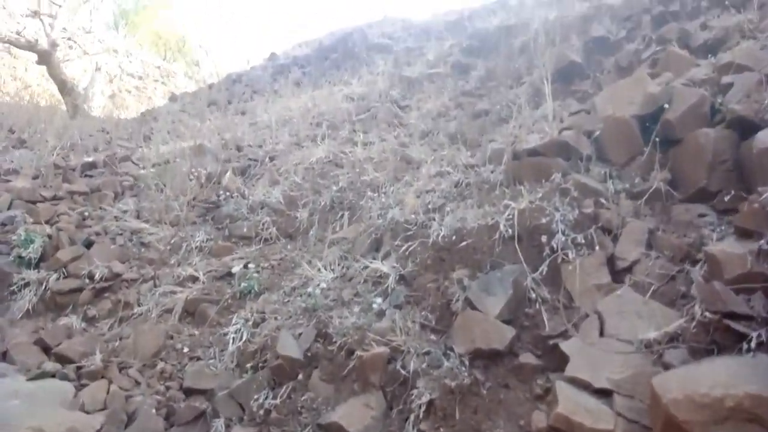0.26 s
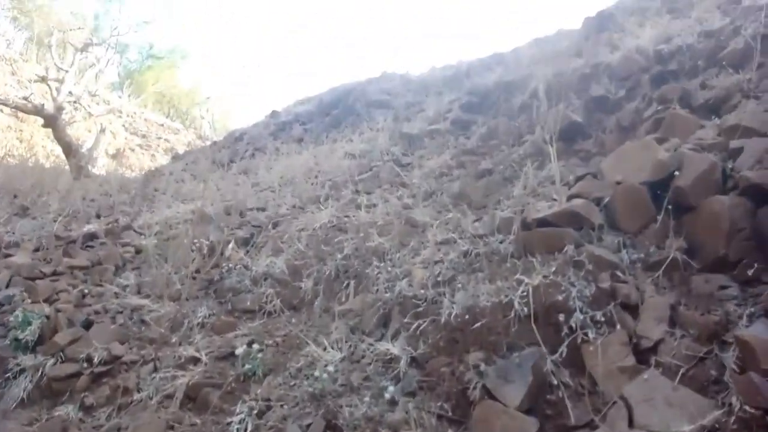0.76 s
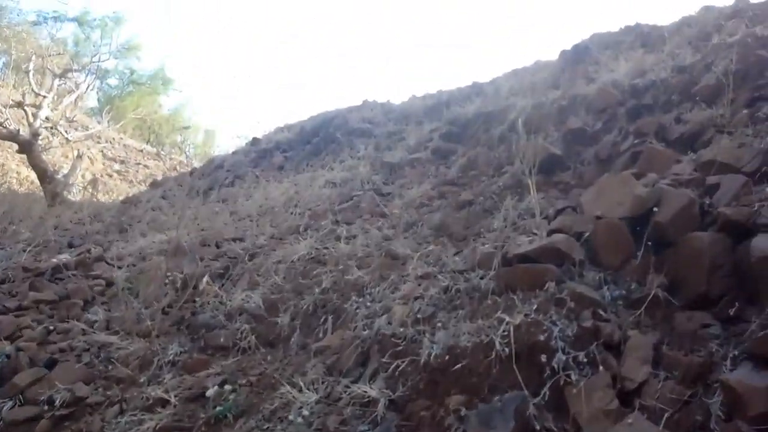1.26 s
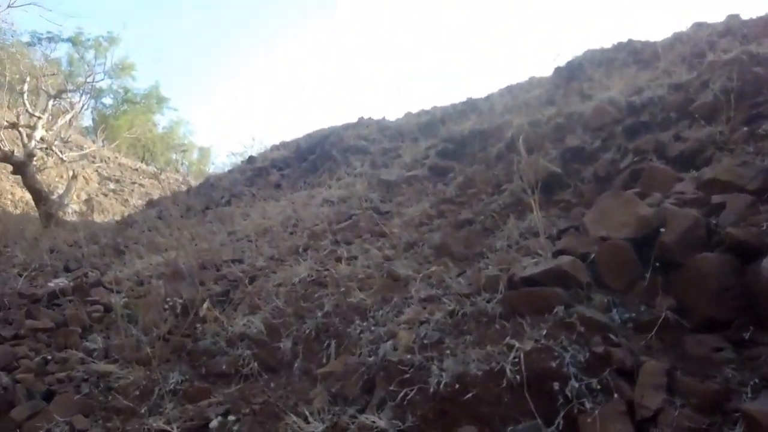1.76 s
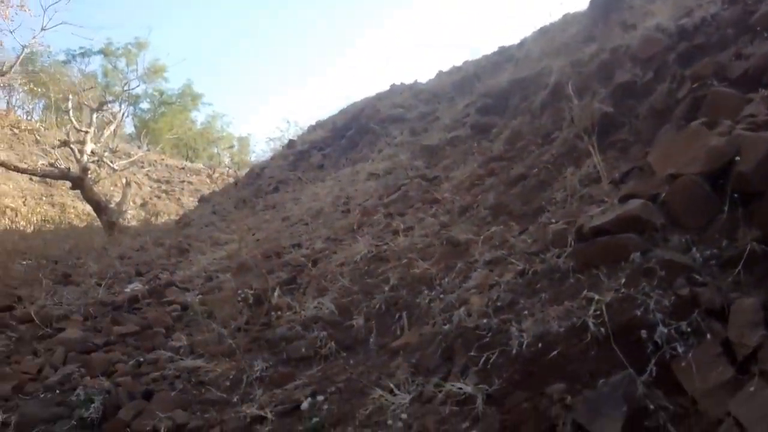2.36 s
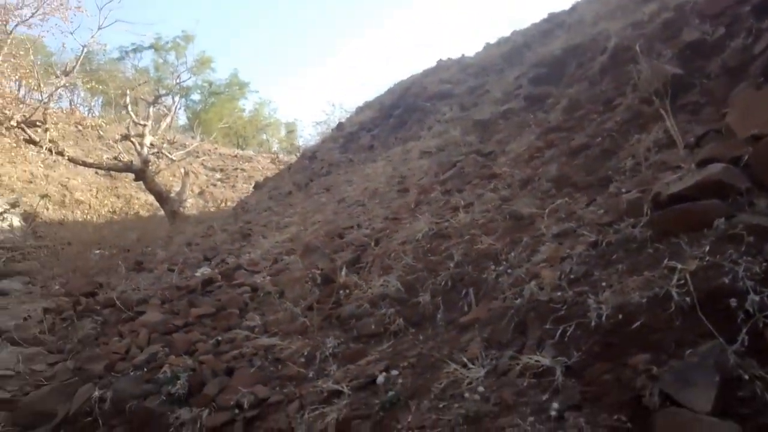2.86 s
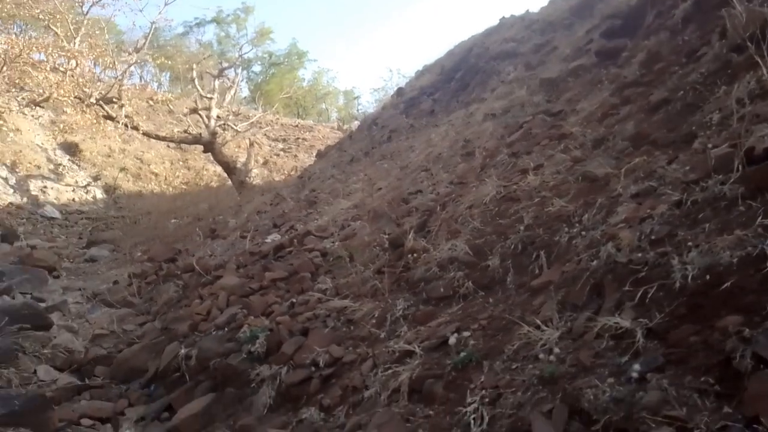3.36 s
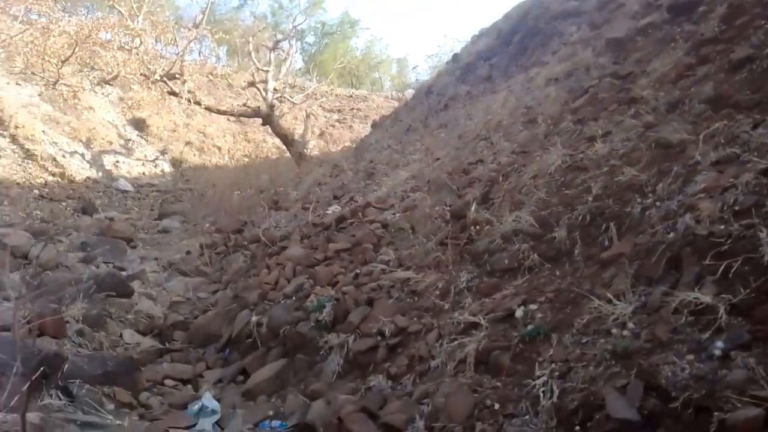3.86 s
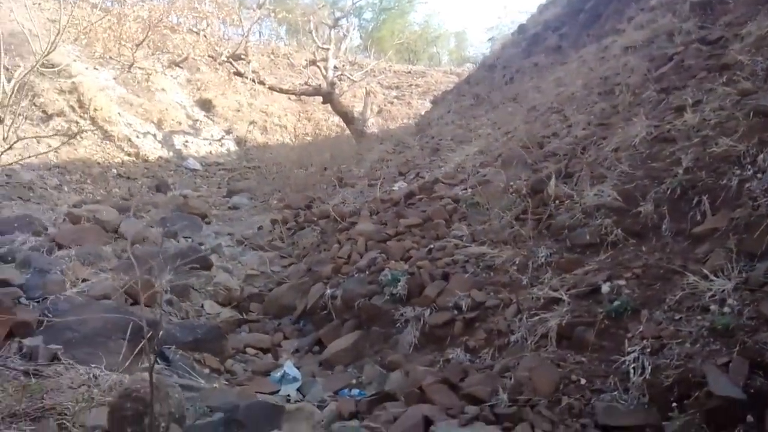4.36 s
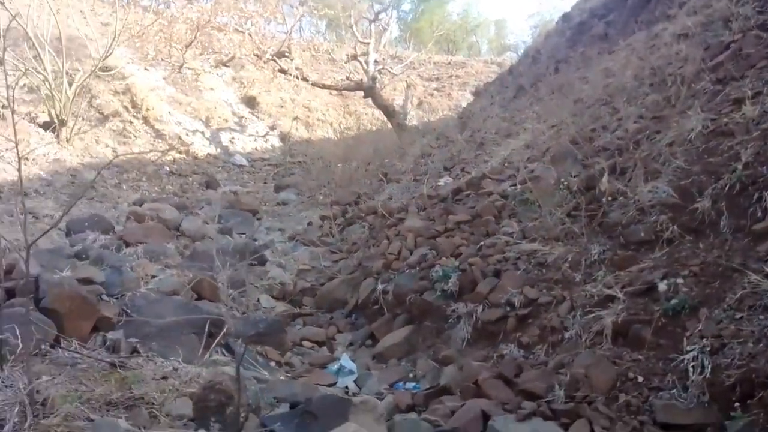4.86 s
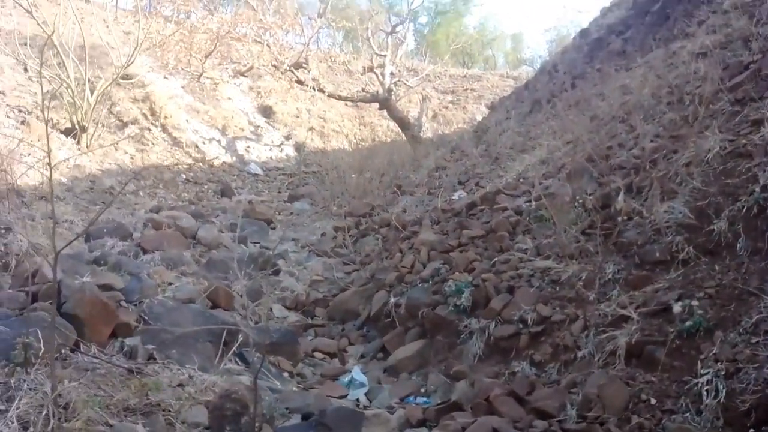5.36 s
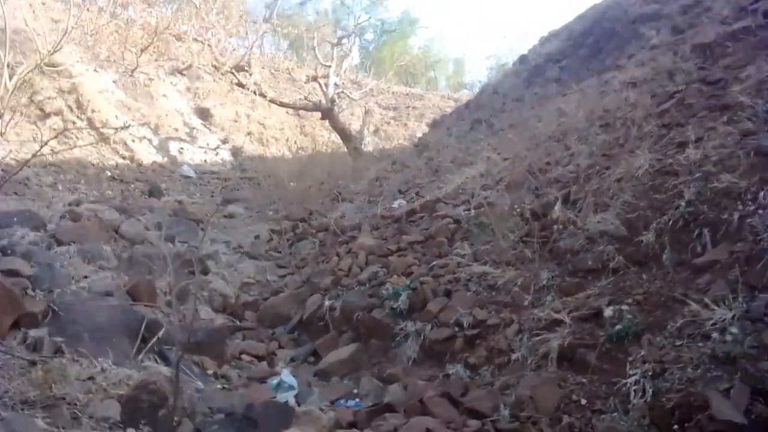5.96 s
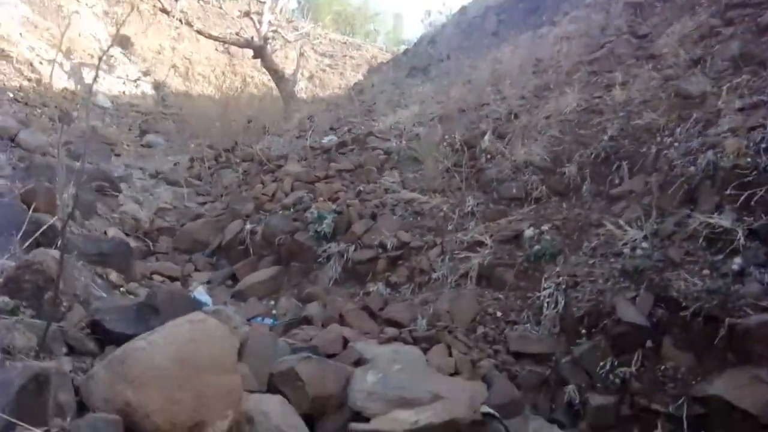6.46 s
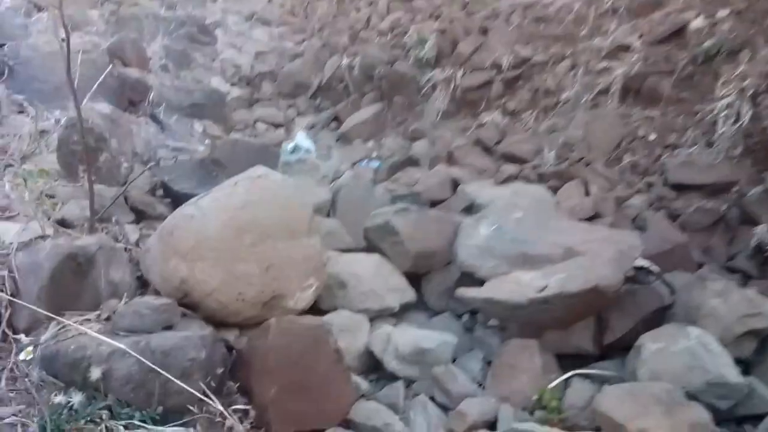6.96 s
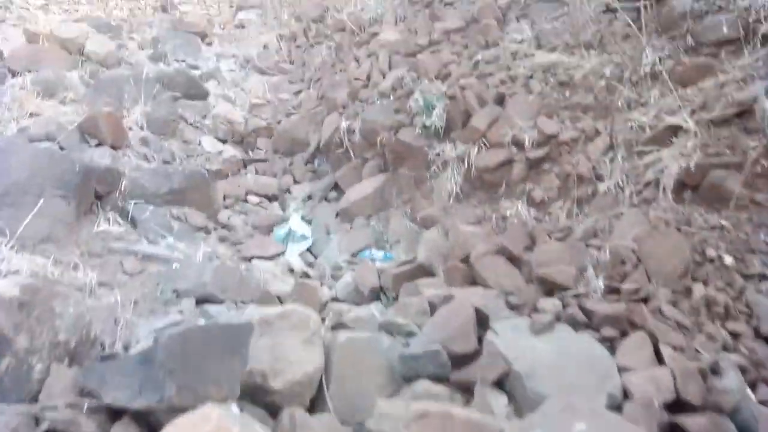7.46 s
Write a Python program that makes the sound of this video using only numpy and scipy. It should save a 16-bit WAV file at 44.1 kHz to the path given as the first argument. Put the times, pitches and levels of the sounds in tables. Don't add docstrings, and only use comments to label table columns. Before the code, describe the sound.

Someone walks slowly over loose stones and dry grass in a dry stream bed, heard close on a hand-held phone. Sharp isolated snaps open the scene, grit crunches and grass rustles, pebbles click. Faint birds pipe far away. Near the end a rock works loose, scrapes, squeaks briefly and lands with a hard thud; the sound then dulls, and larger cobbles knock and settle low.

```python
import sys
import numpy as np
from scipy import signal
from scipy.fft import rfft, irfft
from scipy.io import wavfile
from scipy.ndimage import uniform_filter1d

SR = 44100
rng = np.random.default_rng(int(sys.argv[2]) if len(sys.argv) > 2 else 0)


def dump_mix(stems):
    frames = np.atleast_2d(stems).T
    limited = np.clip(frames, -1, 1)
    pcm = np.round(limited * 32767).astype(np.int16)
    wavfile.write(sys.argv[1], SR, pcm)


def voltage_ratio(level):
    return 10 ** (np.asarray(level, float) / 20)


N = 340319


def evened(x):
    return x / np.sqrt(np.mean(x ** 2) + 1e-20)


def read(points, hz):
    f, value = np.transpose(points)
    return np.interp(np.log(hz + 1), np.log(f + 1), value)


def add(mix, s, sound):
    sound = sound[max(-round(s * SR), 0):]
    part = mix[max(round(s * SR), 0):][:len(sound)]
    part += sound[:len(part)]


def band(x, hz, width):
    f = np.fft.rfftfreq(len(x), 1 / SR)
    bell = np.exp(-.5 * ((f - hz) / width) ** 2)
    return evened(irfft(rfft(x) * bell, len(x)))


def flick(t, hz, cycles):
    return -np.cos(2 * np.pi * hz * t) * np.exp(-.5 * (t * hz / cycles) ** 2)


def tipped(s):
    return np.clip((s - 5.9) / 0.28, 0, 1)


def wavering_tone(rows, wander_hz):
    s, hz, db = np.transpose(rows)
    t = np.arange(s[0], s[-1], 1 / SR)
    chance = rng.standard_normal((2, SR + SR // 8))
    wander = evened(uniform_filter1d(chance, 130, axis=1))[:, :len(t)]
    pitch = uniform_filter1d(np.interp(t, s, hz), size=200) + wander_hz * wander[0]
    level = voltage_ratio(np.interp(t, s, db) + 2.1 * wander[1])
    return s[0], level * np.sin(2 * np.pi * np.cumsum(pitch) / SR) * signal.windows.tukey(len(t), .22)


def rumble():
    t = np.arange(N) / SR
    lumps = voltage_ratio(2.6 * band(rng.standard_normal(N), 0, 2.8))
    noise = rng.standard_normal(N)
    settling = voltage_ratio(-67.5) * band(noise, 366, 45) * np.exp(-.5 * ((t - 7.42) / 0.21) ** 2)
    swish = voltage_ratio(-86.5) * band(noise, 10000, 1100) * np.exp(-.5 * ((t - 3.83) / .17) ** 2)
    breeze = lumps * (voltage_ratio(-64.5) * band(noise, 40, 30) + voltage_ratio(-68.5) * band(noise, 110, 88))
    sway = voltage_ratio(-78.0) * band(noise, 5, 6.0)
    return settling + swish + breeze + sway


# (time [s], pitch [Hz], level [dB])
BIRD_CALLS = [
    [(-.15, 2760, -74), (.26, 2720, -73), (.45, 2740, -84), (.56, 2710, -67), (.66, 2710, -75),
     (.95, 2690, -84)],
    [(1.165, 6450, -78), (1.2, 6730, -79), (1.245, 5400, -62)],
    [(3.42, 6230, -72), (3.46, 6700, -81), (3.52, 5200, -60)],
    [(5.585, 2780, -69), (5.61, 2700, -62), (5.655, 2700, -61)],
    [(6.29, 2780, -67), (6.33, 2900, -57.5), (6.355, 2960, -67), (6.38, 2975, -56.5), (6.42, 2950, -80)],
    [(6.6, 3200, -72), (6.65, 3200, -67), (6.69, 3210, -81), (6.74, 3200, -74), (6.79, 3170, -69)],
    [(6.855, 3600, -66), (6.89, 3550, -60), (6.93, 3300, -72)],
    [(7.288, 2280, -61), (7.297, 3030, -61), (7.316, 2070, -59), (7.326, 2270, -68), (7.337, 2620, -65),
     (7.35, 2150, -61)],
]


def bird(rows):
    return wavering_tone(rows, 22)


# (start [s], end [s], level [dB], ring against level [dB])
GRASS_SWEEPS = [(-.2, 0.517, -77, -11), (0.664, 1.037, -68, -13), (0.97, 1.274, -71.5, -8.5),
                (1.22, 1.48, -80, 1), (1.57, 1.703, -81, 4.5), (1.814, 2.128, -74, -15),
                (2.153, 2.63, -67, -12), (2.546, 2.816, -68.5, -11.5), (2.862, 3.273, -65.5, -10.5),
                (3.215, 3.725, -65.5, -10), (3.573, 4.21, -61, -11), (4.09, 4.625, -63.5, -12),
                (4.403, 5.185, -64.5, -14), (5.14, 5.41, -66, -11), (5.336, 5.506, -56, -14),
                (5.527, 5.857, -60, -13.5), (5.783, 5.963, -52.5, -11), (5.897, 6.1, -68, -3.5),
                (5.44, 5.6, -68.5, -14), (2.78, 2.92, -83.5, 4), (6.307, 6.743, -70, -6),
                (6.605, 7.27, -64.5, -4), (6.929, 7.033, -57, -6.5), (7.055, 7.183, -63.5, -7),
                (6.997, 8.19, -73.5, -2)]


def sweeps(t):
    edge = 0.58
    still_db, tipped_still_db = [-70, -76, -88], [-66, -70, -81]
    tip = tipped(t)
    power = voltage_ratio(np.outer(still_db, 1 - tip) + np.outer(tipped_still_db, tip)) ** 2
    low_db = -4.5 + 6.5 * tip
    for start, end, db, ring_db in GRASS_SWEEPS:
        u = (t - start) / (end - start)
        shape = np.sin(np.pi / 2 * np.clip(np.minimum(u, 1 - u) * 2 / edge, 0, 1)) ** 2
        power = power + shape * voltage_ratio(db + np.array([low_db, 0 * t, ring_db + 0 * t])) ** 2
    return np.sqrt(power)


# (frequency [Hz], density [dB per Hz])
LEVEL_COLOUR = [(88, -23.5), (150, 2.5), (434, -13), (934, -6), (1600, -6), (2150, -0.5), (2650, -6.5),
                (3100, -13.5), (3750, -12), (4330, -17), (5350, -10), (6400, -23.5), (7370, -34),
                (10900, -35.5), (16500, -53.5)]
# (frequency [Hz], density [dB per Hz])
TIPPED_COLOUR = [(88, -36), (150, 6), (250, -2.5), (386, -3), (682, -7.5), (1050, -10.5), (1350, -13.5),
                 (2500, -17.5), (6300, -25.5), (7900, -24), (9300, -35.5), (13500, -40.5), (15200, -32),
                 (16500, -28)]


def rustle():
    frames, hz = N // 64 + 8, np.fft.rfftfreq(256, 1 / SR)
    size = frames * 64
    t = np.arange(frames) * 64 / SR
    tip = tipped(np.arange(size) / SR)

    ticks = voltage_ratio(2.16 * np.minimum(rng.exponential(1, size), 5))
    ticks = ticks * (rng.random(size) < 400 / SR)
    drive = evened(rng.standard_normal(size) + 3.7 * ticks * (1 - 0.46 * tip))

    stray = voltage_ratio(1.5 * (-1 + np.minimum(rng.exponential(1, size), 3)))
    stray = stray * (rng.random(size) < 42 / SR) * (1 - 0.83 * tip)
    lift = signal.lfilter([1], [1, -np.exp(-1 / (.003 * SR))], stray)
    drive = drive * (1 + 1.1 * lift) + 2.7 * stray

    z = signal.stft(drive, nperseg=256, noverlap=192)[2][:, :frames]
    luck = rng.standard_normal((frames, 129))
    patches = evened(uniform_filter1d(uniform_filter1d(luck, 30, 0), 3, 1)).T
    specks = evened(uniform_filter1d(uniform_filter1d(luck[::-1], 6, 0), 7, 1)).T
    flicker = evened(uniform_filter1d(rng.standard_normal(frames), size=8))
    texture_db = 1.8 * patches + 1.0 * flicker + 2.13 * np.maximum(specks, -.5) - 1.46

    level_db = np.outer(read(LEVEL_COLOUR, hz), 1 - tipped(t))
    tipped_db = np.outer(read(TIPPED_COLOUR, hz), tipped(t))
    colour = voltage_ratio(level_db + tipped_db)
    part = np.searchsorted([900, 3800], hz)  # low, body and ring meet at these Hz
    for k, level in enumerate(sweeps(t)):
        share = np.sqrt((colour[part == k] ** 2).sum(0) / len(hz))
        colour[part == k] *= level / share
    z = z * uniform_filter1d(colour, size=2, axis=0) * voltage_ratio(texture_db)
    return signal.istft(z, nperseg=256, noverlap=192)[1][:N]


# (time [s], peak [dB])
STALK_TICKS = [(1.051, -62), (3.589, -63), (4.093, -57), (4.8355, -60), (4.9125, -64), (4.9805, -63),
               (5.174, -61), (5.2715, -62), (5.314, -55), (5.768, -57), (5.7765, -53), (5.911, -31),
               (6.9165, -54)]


def stalk(s, db):
    t = np.arange(200) / SR - .002
    return s - .001, voltage_ratio(db + 1) * (flick(t, 5030, 1.46) + 0.48 * flick(t, 10100, 0.92))


# (time [s], level [dB], pitch [Hz])
DRY_CHIPS = [(0.801, -65, 5700), (0.906, -60, 2010), (.983, -74, 5640), (.999, -70, 5500),
             (1.047, -67, 5500), (1.097, -70, 5600), (1.096, -57, 2120), (1.117, -70, 5530),
             (1.186, -60, 2300), (2.399, -66, 6200), (2.442, -59, 5100), (2.623, -69, 5600),
             (2.684, -64, 5900), (2.9, -60.5, 3320), (2.9338, -66, 3550), (2.973, -73, 5700),
             (3.0116, -58, 3610), (3.0186, -58, 4930), (3.02, -49, 2340), (3.145, -61, 5650),
             (3.2052, -64, 5430), (3.4203, -53, 2090), (3.4217, -57.5, 3800), (3.733, -55, 4650),
             (4.0285, -53, 4680), (4.2109, -62.5, 5360), (4.26, -54, 5070), (4.3327, -64, 5300),
             (4.4993, -61, 4050), (4.5008, -47, 2070), (4.5881, -64.5, 5500), (4.863, -64, 5200),
             (4.893, -67, 3600), (4.9383, -61, 4650), (4.9927, -60, 5380), (5.098, -65, 5100),
             (5.2107, -55, 2130), (5.2521, -61, 4500), (5.2843, -41, 5620), (5.37, -58, 5200),
             (5.8412, -47, 5400), (5.9278, -48, 4240), (5.9645, -58, 3000), (5.9645, -57, 4720),
             (5.9776, -51.5, 4570), (6.0024, -60, 2530), (6.0024, -59, 4400), (6.02, -65, 4500),
             (6.0955, -67, 2130), (6.151, -59, 860), (6.2982, -68, 4300), (6.493, -52, 7700),
             (6.5062, -59, 4290), (6.5366, -59, 5400), (6.5935, -68, 4340), (6.6349, -65, 5240),
             (6.6514, -59.5, 4420), (6.686, -55.5, 7600), (6.9896, -53, 4770), (7.1108, -57, 3360)]


def chip(s, db, hz):
    top_s = 0.0011
    noise = rng.standard_normal(1024)
    u = np.arange(len(noise)) / SR / top_s
    tone = band(noise, hz, 0.059 * hz) + 0.44 * band(noise, hz, 1100)
    air = 0.083 * band(noise, 10500, 2400)
    return s - .5 * top_s, voltage_ratio(db) * (tone + air) * u * np.exp(1 - u)


def grit(s, chance, hz, ring_db, air_db, knock_db):
    grains = chance[0] * voltage_ratio(3.0 * evened(uniform_filter1d(chance[1], size=40)))
    stones = 0.55 * band(grains, hz, 120) + 0.079 * band(grains, hz * 1.52, 200)
    body = 0.8 * band(grains, 2150, 1230)
    tip = tipped(s)
    ring = band(grains, 5500 - 500 * tip, 650 + 1000 * tip)
    air = band(grains, 10500 - 2300 * tip, 2600 - 1500 * tip) + 0.39 * tip * band(grains, 15700, 2700)
    knock = band(grains, 310, 320)
    return stones + body + voltage_ratio(ring_db) * ring + voltage_ratio(air_db) * air + voltage_ratio(knock_db) * knock


# (time [s], level [dB], pitch [Hz], ring [dB])
GRIT_PINCHES = [(.194, -57, 1370, -3), (.783, -50, 2310, -15), (.808, -58, 2270, -11),
                (.842, -53, 2520, -9), (.853, -57, 2360, -5), (1.009, -57, 2020, -13),
                (1.023, -54.5, 3030, -7.5), (1.14, -54, 2250, -14), (1.201, -52, 2160, -17),
                (2.286, -69, 1710, 3.5), (2.418, -52.5, 1960, -14), (2.484, -53, 2200, -19),
                (2.769, -54, 2520, -14), (3.07, -51, 2070, -16), (3.128, -58.5, 2490, -3),
                (3.462, -51.5, 2860, 4), (3.54, -56, 2260, -13), (3.643, -50, 2090, -12),
                (3.732, -46.5, 1660, -0.5), (3.898, -52.5, 2120, -9), (4.426, -44.5, 2180, -10.5),
                (4.708, -54, 2370, -18), (4.963, -62, 2220, -2), (5.133, -58, 2240, -10),
                (5.322, -56.5, 2000, 1), (5.759, -59, 1740, 1), (6.041, -56, 2880, -10),
                (6.166, -53, 2000, -7.5), (6.864, -54, 2560, -4.5), (7.104, -48, 1380, -17)]
# (time [s], level [dB], pitch [Hz], ring [dB])
GRIT_CRUNCHES = [(.242, -66, 2190, -4.5), (.426, -56.5, 1540, -12), (.722, -53, 2460, -12),
                 (.819, -46, 1950, -14.5), (.941, -56, 2800, -6.5), (1.06, -52.5, 2420, -13),
                 (1.977, -66, 1480, 0.5), (2.44, -54, 2050, -5.5), (2.465, -57.5, 2370, -2.5),
                 (2.539, -45.5, 2420, -14.5), (2.593, -52, 1730, -12), (2.647, -58, 2070, -11),
                 (3.004, -46.5, 2340, -10), (3.029, -55, 1450, -8), (3.175, -47, 2360, -17.5),
                 (3.195, -56, 2150, -9), (3.219, -56, 2470, -6), (3.375, -55.5, 2230, -10),
                 (3.493, -58, 2380, -15), (4.081, -51.5, 1970, -13), (4.264, -53, 1950, -10),
                 (4.726, -49, 2570, -9.5), (4.763, -52.5, 1720, -8), (5.016, -41.5, 2100, -9),
                 (5.2, -58, 2060, -4.5), (5.285, -42, 2400, -12), (6.493, -57.5, 2770, -0.5),
                 (6.537, -55, 1000, -9.5), (6.939, -58, 1820, 8.5), (7.091, -51, 1930, -6)]


def crunch(s, db, hz, ring_db, top_s):
    u = np.arange(1600) / SR / top_s
    air_db = ring_db - 13.0 + 12 * tipped(s)
    first = .7 + 3 * np.exp(-u / .4)
    grains = grit(s, rng.standard_normal((2, 1600)), hz, ring_db, air_db, -50)
    return s, voltage_ratio(db) * grains * u * np.exp(1 - u) * first


# (time [s], peak [dB], mode [Hz], t60 [s])
STONE_RINGS = [(1.987, -48.5, 394, 0.053), (1.987, -43.5, 918, 0.032), (3.688, -41, 384, .035),
               (3.688, -43, 596, .025), (3.722, -45, 393, 0.063), (3.722, -43, 645, 0.031),
               (3.79, -46, 240, .03), (3.8054, -37.5, 396, .035), (3.8055, -37, 613, 0.015),
               (3.9579, -25, 1400, 0.018), (3.9643, -30.5, 290, 0.02), (4.491, -48, 393, 0.074),
               (4.491, -42, 600, 0.024), (5.435, -29.5, 1830, 0.0066), (5.465, -37.5, 220, 0.047),
               (5.506, -42, 296, .025), (5.521, -45, 170, 0.055), (5.572, -47, 190, 0.056),
               (5.588, -44, 190, 0.079), (5.871, -27, 966, 0.054), (5.871, -28, 2260, .015),
               (6.705, -35.5, 350, 0.027), (6.705, -30.5, 910, 0.037), (6.706, -42, 1440, .03),
               (6.707, -38, 2600, 0.017), (6.713, -42, 897, 0.032), (6.77, -47, 950, 0.038),
               (6.8, -34, 373, 0.026), (6.7998, -41, 1000, .02), (6.808, -36, 632, 0.078),
               (6.811, -37, 850, 0.059), (6.83, -42, 1240, 0.027), (7.002, -43, 430, 0.046),
               (7.003, -44, 250, 0.05), (7.103, -41, 1430, 0.033), (7.122, -41.5, 433, .045),
               (7.141, -43, 264, 0.037), (7.141, -46, 684, .025), (7.168, -49, 420, .05),
               (7.204, -41, 258, 0.043), (1.987, -50, 600, 0.032), (2.561, -22, 3120, 0.0042),
               (3.8032, -33.5, 2810, 0.014), (6.51, -47, 184, 0.089), (6.702, -45, 169, 0.055)]


def ringing(s, db, hz, t60):
    t = np.arange(4000) / SR
    return s, -voltage_ratio(db - 60 * t / t60) * np.sin(2 * np.pi * hz * t) * (1 - np.exp(-t / 0.00022))


# (time [s], peak [dB], pitch [Hz], ring [dB], knock [dB])
STEM_SNAPS = [(.3358, -9.5, 1920, -23.5, -16), (1.3249, -8, 1880, -24, -12.5),
              (1.4984, -13, 2560, -4.5, -46), (1.5389, -10, 1880, -28.5, -11.5),
              (1.9871, -43, 1490, -22, -9), (2.5614, -17.5, 1084, -26, -34),
              (3.6869, -26.5, 1450, -11.5, -13), (3.7105, -28.5, 1410, -15, -10),
              (3.716, -31, 1520, -3.5, -9), (3.8042, -22, 1790, -9.5, -14), (3.83, -28.5, 1650, -14, -14),
              (3.9478, -25, 1790, -32, -9), (3.9599, -25.5, 2000, 1.5, -26),
              (3.9635, -25.5, 1950, -10, -3.5), (4.0342, -21, 1800, -27, -14.5),
              (4.4899, -22, 1900, -5.5, -11.5), (4.538, -33.5, 1900, -18, -9),
              (4.611, -39.5, 1410, -25, -13), (4.662, -38.5, 1280, -28, -18)]
# (time [s], peak [dB], pitch [Hz], ring [dB], knock [dB])
ROCKFALL_CLICKS = [(5.436, -28.5, 790, -36, 3.5), (5.5054, -51, 660, -17, 13),
                   (5.5587, -32.5, 1200, -21, -28), (5.6211, -13.5, 1770, -32.5, -5.5),
                   (5.6627, -27.5, 1570, -18, -13), (5.7841, -16.5, 2230, -5.5, -19),
                   (5.7943, -40, 2240, 1, -22), (5.8104, -21, 2070, -10, -14), (5.8262, -20.5, 1590, -1, 1),
                   (5.8449, -39, 2200, -32, 3), (5.8549, -9, 2400, -10, -13.5),
                   (5.8677, -19, 2230, -23.5, -8), (5.872, -24.5, 1620, -19.5, -12),
                   (5.876, -22.5, 1370, -18, -16.5), (5.888, -40, 1410, -14, -22),
                   (5.891, -26, 2430, 3, -17), (5.9003, -10.5, 800, -14, -11),
                   (5.9072, -27, 917, -20, -7.5), (5.9114, -16.5, 1400, -11, -18),
                   (5.929, -42, 1160, -1, -13), (5.9396, -27.5, 2180, -8, -4.5)]
# (time [s], peak [dB], pitch [Hz], ring [dB], knock [dB])
COBBLE_CLICKS = [(6.7048, -32, 765, -8, 4), (6.7078, -30, 930, -6, -30), (6.749, -47, 720, -29, 7),
                 (6.771, -36, 1290, -27, -19), (6.8024, -27.5, 980, -30, -24), (6.7995, -32, 1480, -29, -8),
                 (6.81, -26.5, 1420, -30, -14), (6.8143, -34, 795, -25, -29), (6.83, -33.5, 1090, -15, 5.5),
                 (6.831, -29.5, 880, -20, 1), (6.997, -25.5, 2400, -11, -18), (7.1427, -48, 690, -20, 7),
                 (7.205, -49, 690, -17, 7), (7.219, -49, 690, -19, 8)]


def snap(s, db, hz, ring_db, knock_db):
    t = np.arange(1600) / SR - .004
    chance = rng.standard_normal((2, 1600))
    tip = tipped(s)
    air_db = -14 + 1.08 * ring_db * (1 - 0.5 * tip)
    after = np.clip(t / 0.00018, 0, 1) ** 2

    tail = voltage_ratio(-32.0) * np.sin(2 * np.pi * 6000 * t) * after * voltage_ratio(-60 * t / 0.039)
    ring = flick(t + .0001, 4890, 0.67) + tail
    air = flick(t + 0.000083, 10500 - 2300 * tip, 1.24) + voltage_ratio(-13.5) * flick(t, 15000, 1.6)
    overtone = voltage_ratio(.5 * ring_db - 20.0) * flick(t + .0001, 3370, 1.0)
    swing = flick(t, hz, 0.38) + voltage_ratio(ring_db) * ring + voltage_ratio(air_db) * air + overtone
    rocking = band(chance[1], hz, 350) * after * voltage_ratio(-6 - .012 * hz - 60 * t / .014)

    rattle = grit(s, chance, hz, ring_db, air_db - 8, knock_db) * after * voltage_ratio(-60 * t / .008)
    loose_db = -17 + .36 * ring_db
    knock = flick(t - .00046, 550, 0.29)
    return s - .004, voltage_ratio(db) * (swing + rocking + voltage_ratio(loose_db) * rattle + voltage_ratio(knock_db) * knock)


# (time [s], pitch [Hz], level [dB])
STONE_SCRAPES = [
    [(2.04, 1203, -64), (2.115, 1146, -65.5), (2.19, 945, -65)],
    [(2.12, 2440, -65), (2.15, 2660, -66), (2.18, 2600, -76)],
    [(5.44, 1055, -51), (5.46, 1260, -51.5), (5.49, 1354, -59)],
    [(6.004, 2440, -62), (6.02, 2720, -59), (6.037, 2950, -67)],
    [(5.925, 1195, -56), (5.95, 1196, -51.5), (5.968, 1100, -60)],
]


def scrape(rows):
    return wavering_tone(rows, 150)


# (time [s], pitch [Hz], level [dB])
ROCK_SQUEAK = [
    (5.732, 1433, -52),
    (5.76, 1700, -47),
    (5.79, 1743, -46.5),
    (5.81, 1748, -49),
    (5.825, 2605, -38.5),
    (5.858, 2557, -33),
]


def squeak():
    return wavering_tone(ROCK_SQUEAK, 47)


# (start [s], end [s], level [dB], pitch [Hz], knock [dB])
STONE_SLIDES = [
    (2.041, 2.226, -75.5, 1030, 6.5),
    (5.439, 5.488, -55, 2900, -2),
    (5.556, 5.572, -54.5, 2200, -2),
    (5.84, 5.865, -44, 2530, 0),
    (5.867, 5.89, -37, 1000, -2),
    (5.9, 5.918, -27, 950, -8),
    (6.792, 6.828, -48.5, 1980, 1),
    (6.943, 7.024, -59, 1910, -9),
    (7.085, 7.146, -57, 1580, -3),
]


def slide(s, end, db, hz, knock_db):
    size, ring_db = round((end - s) * SR), -18.5
    air_db = ring_db - 13.5 + 12 * tipped(s + 0.11)
    rubbed = grit(s, rng.standard_normal((2, 8192)), hz, ring_db, air_db, knock_db)
    return s, voltage_ratio(db) * rubbed[:size] * signal.windows.tukey(size, .4)


# (time [s], peak [dB], swing [Hz], t60 [s], dip [dB])
ROCK_THUDS = [
    (5.9128, -5, 91, .04, -3.5),
    (5.93, -29, 90, .091, -50),
    (5.845, -24, 150, 0.033, -48),
]


def thud(s, db, hz, t60, dip_db):
    t = np.arange(6000) / SR - .003
    rise = np.sin(np.pi / 2 * np.clip(t / 0.00054, 0, 1)) ** 2
    push = rise * np.cos(2 * np.pi * hz * (t - .0019))
    dip = np.exp(-.5 * ((t + 0.00014) / 0.00038) ** 2)
    return s - .003, voltage_ratio(db - 60 * t / t60) * push - voltage_ratio(dip_db) * dip


def scene():
    mix = rumble() + rustle()
    for rows in BIRD_CALLS:
        add(mix, *bird(rows))
    for row in STALK_TICKS:
        add(mix, *stalk(*row))
    for row in DRY_CHIPS:
        add(mix, *chip(*row))
    for table, top_s in ((GRIT_PINCHES, 0.0017), (GRIT_CRUNCHES, 0.003179)):
        for row in table:
            add(mix, *crunch(*row, top_s))
    for row in STONE_RINGS:
        add(mix, *ringing(*row))
    for table in (STEM_SNAPS, ROCKFALL_CLICKS, COBBLE_CLICKS):
        for row in table:
            add(mix, *snap(*row))
    for rows in STONE_SCRAPES:
        add(mix, *scrape(rows))
    add(mix, *squeak())
    for row in STONE_SLIDES:
        add(mix, *slide(*row))
    for row in ROCK_THUDS:
        add(mix, *thud(*row))
    return mix[None]


def low_pass(x):
    return signal.sosfilt(signal.butter(12, 16750, fs=SR, output="sos"), x)


def record(dry):
    hissing = dry + voltage_ratio(-95.0) * rng.standard_normal(dry.shape)
    limited = signal.oaconvolve(hissing, signal.firwin(255, 16000, fs=SR)[None], "same")
    finished = limited - .0236
    return low_pass(finished)


dry = scene()
out = record(dry)
dump_mix(out)
```